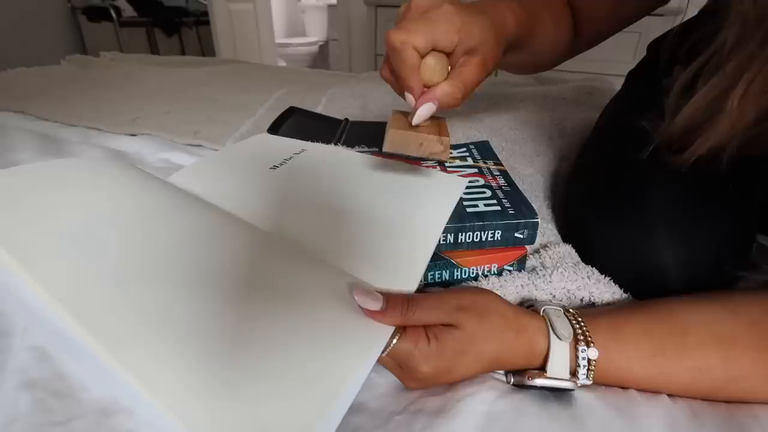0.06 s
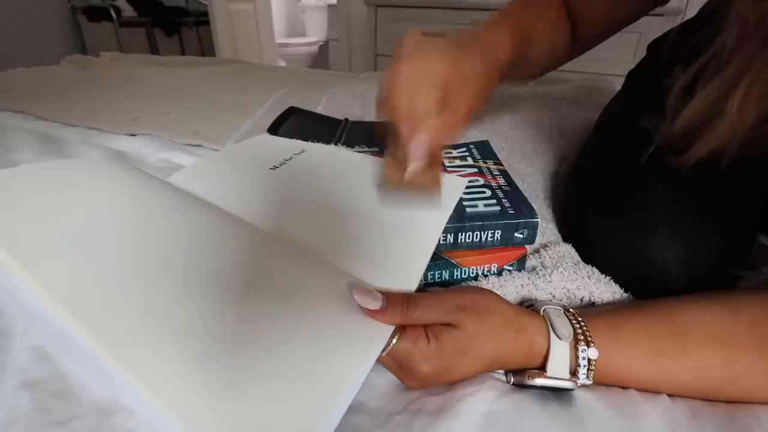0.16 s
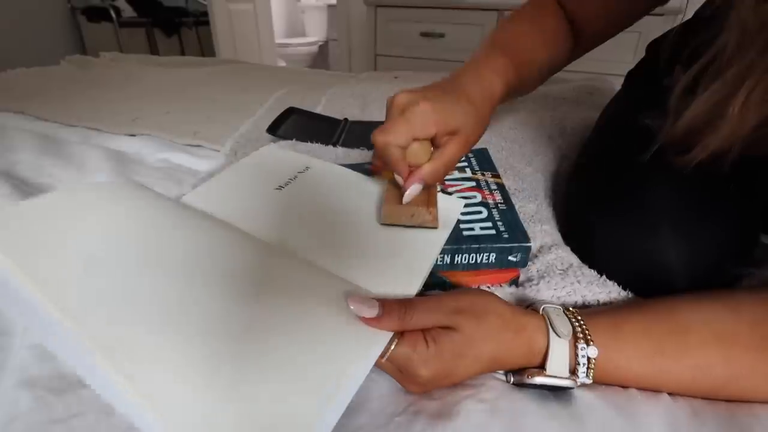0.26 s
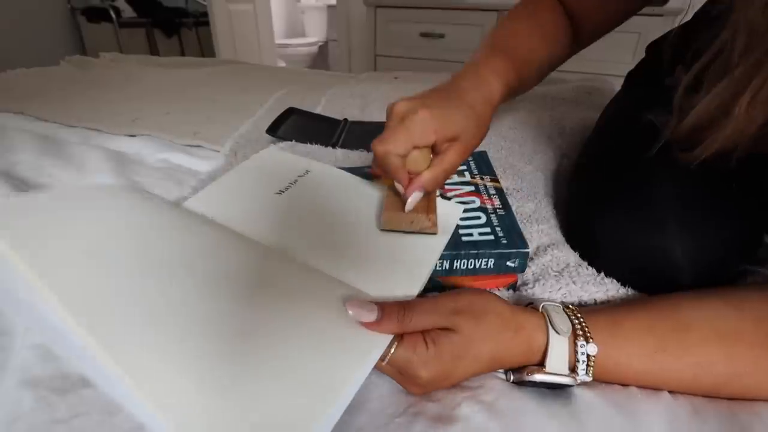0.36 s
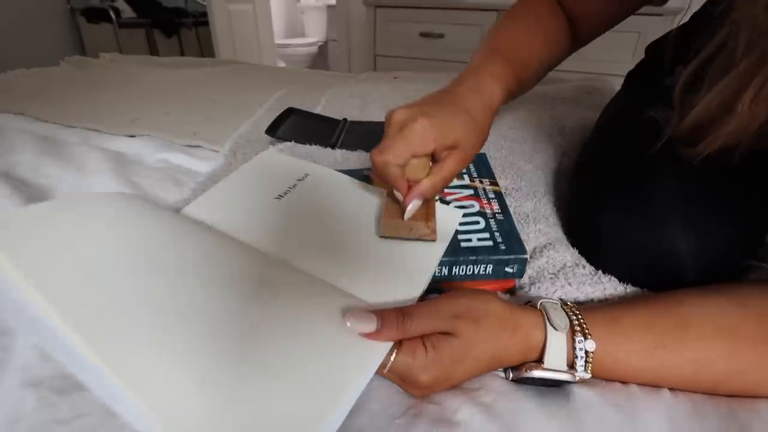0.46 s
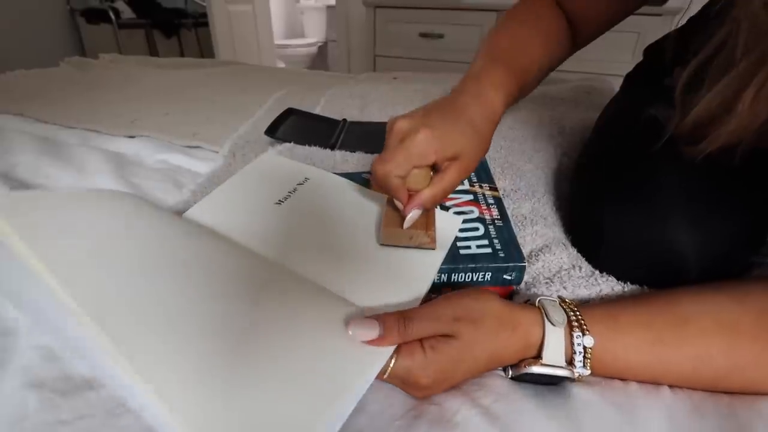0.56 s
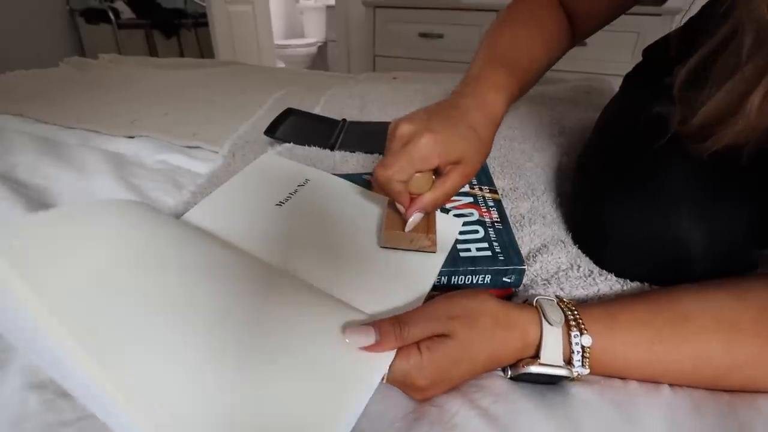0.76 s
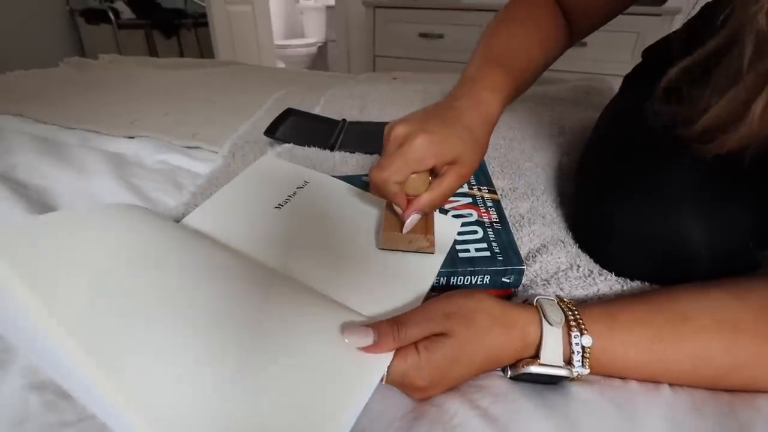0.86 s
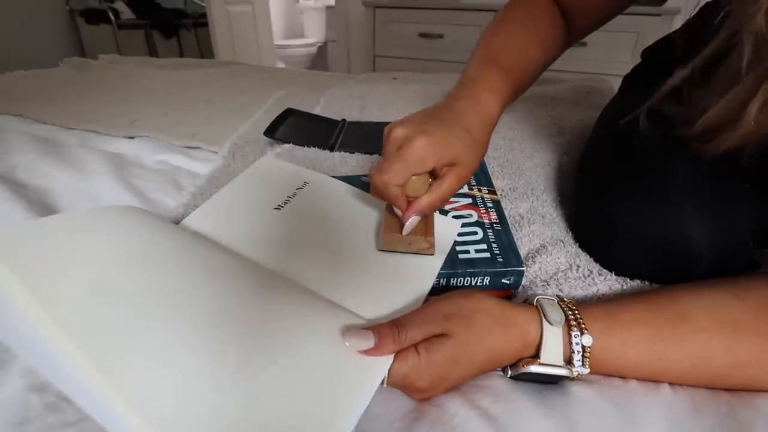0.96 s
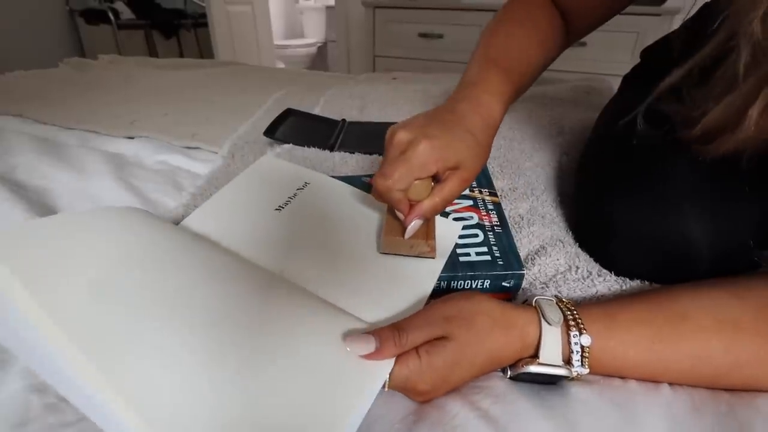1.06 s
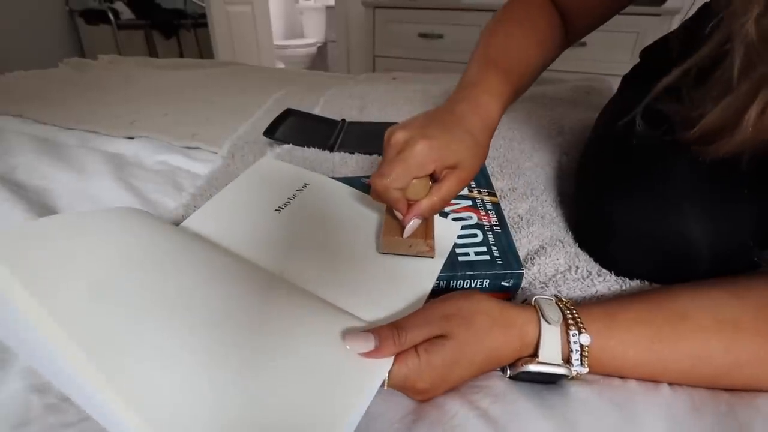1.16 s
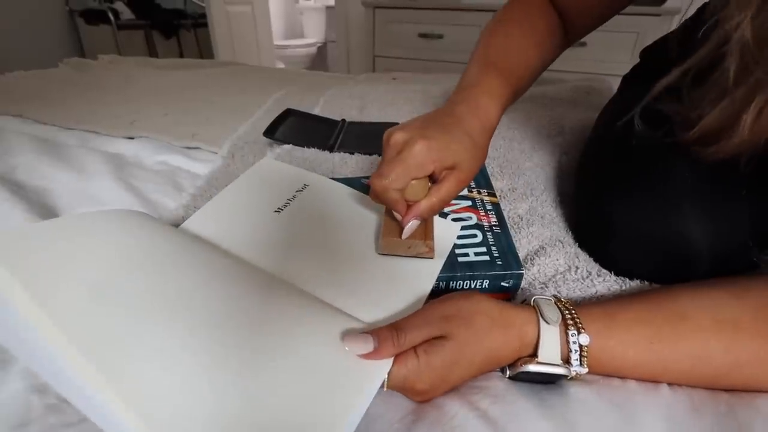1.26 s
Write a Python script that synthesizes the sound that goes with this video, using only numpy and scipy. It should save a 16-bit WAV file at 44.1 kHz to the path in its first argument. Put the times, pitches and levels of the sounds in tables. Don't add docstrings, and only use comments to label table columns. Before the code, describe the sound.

A wooden hand stamp smacks onto a thick book's page, then faint paper ticks and rustle follow

```python
import sys
import numpy as np
from scipy import signal
from scipy.fft import rfft, irfft
from scipy.io import wavfile
from scipy.ndimage import uniform_filter1d, map_coordinates

SR = 44100
rng = np.random.default_rng(int(sys.argv[2]) if len(sys.argv) > 2 else 0)


def persist_wave(psi):
    counts = np.round(np.clip(psi, -1, 1) * 32767).astype(np.int16)
    wavfile.write(sys.argv[1], SR, np.atleast_2d(counts).T)


def nominal_scale(level):
    x = np.asarray(level, float) / 20
    return 10 ** x


N = 57330

# multiple of the mains pitch, rms level in dB.
HUM_MULTIPLES = [(1, -49), (2, -52.5), (3, -54.5), (4, -61), (5, -65.5), (6, -78)]
MAINS_HZ, HUM_FLICKER_DB = 59.82, 1.5
ROTOR_SLIP_HZ, ROTOR_DB, BEAT_PEAK_S = 1.98, -50, 0.7

# frequency in Hz, level in dB per Hz.
AIR_COLOUR = [(30, -6), (55, -0.5), (150, -6.5), (450, -13.5), (1100, -21), (3400, -26.5), (5500, -35),
              (14000, -51)]
AIR_DB, AIR_FLICKER_DB = -51, 0.3
AIR_WIDE_HZ, AIR_TOP_HZ = 700, 12700

# time in seconds, rustle level in dB.
HAND_PRESSURE = [
    (.3, -74.5),
    (.42, -59.5),
    (.5, -60.5),
    (.58, -54),
    (.66, -55.5),
    (.7, -62.5),
    (.97, -61.5),
    (1.08, -72),
    (1.3, -85.5),
]
GRAINS_PER_S, GRAIN_SPREAD_DB = 2500, 1.7
PAPER_LOW_HZ, PAPER_WIDTH_HZ = 500, 2710

# start in seconds, level in dB, pitch in Hz.
PAPER_TICKS = [(.52, -42, 1294), (.538, -62, 1300), (.579, -38.5, 765), (.581, -43, 1830),
               (.606, -47, 1880), (0.633, -45, 1520), (.652, -41, 700), (.653, -42.5, 1850),
               (.666, -54, 1900), (.683, -44.5, 500), (.87, -51, 600), (1.122, -50, 2660),
               (1.231, -47, 600)]
TICK_T60_S, TICK_CLICK_DB = 0.02, -16

# start in seconds, level in dB, contact time in milliseconds.
BLOWS = [
    (0.2242, 0, 0.32),
    (0.2259, -8.5, 0.4),
    (0.2471, -11, 0.53),
]
FIRST_BLOW_S = BLOWS[0][0]

# pitch in Hz, level in dB, time to fade by 60 dB in seconds.
WOOD_MODES = [(367, -9, .025), (464, -1.5, 0.025), (510.4, -18, 0.086), (600, -13.5, 0.066),
              (683, -6, 0.049), (819, -13, 0.058), (922, -14, 0.066), (1050, -31.5, 0.053),
              (1443, -17, .06), (1597, -5.5, .016), (2058, -15, .015), (2360, -13, 0.021),
              (2830, -17, .015), (3400, -48, .01)]

# pitch in Hz, level in dB, time to fade by 60 dB in seconds.
BOOK_MODES = [(108.4, -25, 0.33), (154, -6.5, 0.18), (194.7, -7, 0.16), (274, -12.5, 0.033)]
BOOK_LATE_S, BOOK_PUSH_MS = 0.0065, 4.3

# centre in Hz, width in Hz, level in dB, time to fade by 60 dB in seconds.
PAGE_SLAP = [(689, 93, -20, 0.22), (413, 660, -22, 0.23), (940, 990, -21, 0.24), (2550, 3700, -26.5, 0.26),
             (4900, 510, -41.5, 0.67)]
PAGE_DIP_MS, PAGE_DIP_DB = 0.26, -14
CRACK_DB, CRACK_HZ, CRACK_WIDTH_HZ, CRACK_T60_S = -14, 7740, 3200, 0.0055

ROOM_DB, ROOM_GAP_S = -22.5, 0.006
ROOM_T60_LOW_S, ROOM_T60_HIGH_S = 0.3, 0.26
ROOM_TOP_HZ, ROOM_SHARED_HZ = 3540, 2500

PORT_LAG_MS, KNOCK_PAN_DB = 0.062, 2.8
MIC_LOW_HZ, MIC_TOP_HZ = 95, 9900
DUCK_DB, DUCK_ATTACK_S, DUCK_RELEASE_S, CEILING = -5.5, 0.016, 0.14, 1.03


def band(x, hz, width_hz):
    centre = min(hz, 0.45 * SR)
    sharpness = max(hz / width_hz, 0.3)
    return signal.lfilter(*signal.iirpeak(centre, sharpness, fs=SR), x)


def decay(t60, seconds=0.5):
    t = np.arange(int(seconds * SR)) / SR
    return np.exp(-np.log(1000) * t / t60)


def ring(modes):
    t = np.arange(SR // 2) / SR
    return sum(nominal_scale(db) * np.sin(2 * np.pi * hz * t) * decay(t60) for hz, db, t60 in modes)


def push(at_s, ms):
    progress = (np.arange(N) / SR - at_s) / (ms / 1000)
    touching = (progress > 0) & (progress < 1)
    force = np.where(touching, np.sin(np.pi * progress) ** 2, 0)
    return force / max(force.sum(), 1e-9)


def conv(a, b):
    return signal.fftconvolve(a, b)[:N]


def unit(x):
    return x / np.sqrt(np.mean(x ** 2))


def walk(rate):
    hold = int(SR / rate)
    steps = np.repeat(rng.standard_normal(N // hold + 1), hold)
    smooth = uniform_filter1d(uniform_filter1d(steps, hold), hold)
    return 2.0 * smooth[:N]


def noise_band(hz, width_hz):
    noise = rng.standard_normal(SR // 2)
    return unit(band(band(noise, hz, width_hz), hz, width_hz))


def hum():
    t = np.arange(N) / SR - BEAT_PEAK_S
    out = nominal_scale(ROTOR_DB) * np.cos(2 * np.pi * (MAINS_HZ - ROTOR_SLIP_HZ) * t)
    for multiple, db in HUM_MULTIPLES:
        upper = multiple > 1
        waver_db = upper * HUM_FLICKER_DB * walk(16)
        cycles = multiple * MAINS_HZ * t + upper * rng.random()
        out = out + nominal_scale(db + waver_db) * np.cos(2 * np.pi * cycles)
    return np.sqrt(2) * out


def air():
    hz = np.maximum(np.arange(N // 2 + 1) * SR / N, 1)
    table = np.array(AIR_COLOUR)
    colour_db = np.interp(np.log(hz), np.log(table[:, 0]), table[:, 1])
    gain = nominal_scale(colour_db + np.where(hz > AIR_TOP_HZ, -25.0, 0))
    wide = hz / np.hypot(hz, AIR_WIDE_HZ) * nominal_scale(3.0)
    mid = irfft(rfft(rng.standard_normal(N)) * gain, N)
    side = irfft(rfft(rng.standard_normal(N)) * gain * wide, N)
    level = nominal_scale(AIR_DB + AIR_FLICKER_DB * walk(9)) / np.sqrt(np.mean(mid ** 2))
    return np.array([mid + side, mid - side]) * level


def room(x):
    tails = []
    for _ in range(2):
        noise = rng.standard_normal((2, SR // 2))
        low = signal.lfilter(*signal.butter(1, 900, fs=SR), noise[0]) * decay(ROOM_T60_LOW_S)
        high = band(noise[1], ROOM_TOP_HZ / 2, ROOM_TOP_HZ) * decay(ROOM_T60_HIGH_S) * nominal_scale(3)
        tail = np.concatenate([np.zeros(int(ROOM_GAP_S * SR)), low + high])
        tails.append(conv(x, tail / np.sqrt(np.sum(tail ** 2))))
    left, right = tails
    low_shared = signal.lfilter(*signal.butter(1, ROOM_SHARED_HZ, fs=SR), left - right)
    return nominal_scale(ROOM_DB) * np.array([left, right + low_shared])


def rustle():
    slips = rng.random(N) < GRAINS_PER_S / SR
    grains = slips * rng.standard_normal(N) * nominal_scale(GRAIN_SPREAD_DB * rng.exponential(size=N))
    power = np.abs(conv(grains ** 2, decay(0.015)))
    smear = rng.standard_normal(N) * np.sqrt(power)
    edges_hz = [PAPER_LOW_HZ, PAPER_LOW_HZ + PAPER_WIDTH_HZ]
    edges = signal.butter(2, edges_hz, "band", fs=SR, output="sos")
    fibres = unit(signal.sosfilt(np.vstack([edges, edges]), smear))
    hand = np.array(HAND_PRESSURE)
    return fibres * nominal_scale(np.interp(np.arange(N) / SR, hand[:, 0], hand[:, 1]))


def paper_ticks():
    out = np.zeros(N)
    for start_s, db, hz in PAPER_TICKS:
        click = rng.standard_normal(SR // 2) * decay(0.012) * nominal_scale(TICK_CLICK_DB)
        tick = ring([(hz, 0, TICK_T60_S)]) + click
        out = out + nominal_scale(db) * conv(push(start_s, 0.091), tick)
    return out


def book_thud():
    pushes = sum(nominal_scale(db) * push(s + BOOK_LATE_S, BOOK_PUSH_MS) for s, db, ms in BLOWS)
    return conv(pushes, ring(BOOK_MODES))


def air_crack():
    snap = noise_band(CRACK_HZ, CRACK_WIDTH_HZ) * decay(CRACK_T60_S)
    return nominal_scale(CRACK_DB) * conv(push(FIRST_BLOW_S - PAGE_DIP_MS / 1000, 0.039), snap)


def stamp():
    blows = sum(nominal_scale(db) * push(s, ms) for s, db, ms in BLOWS)
    blows = blows - nominal_scale(PAGE_DIP_DB) * push(FIRST_BLOW_S - PAGE_DIP_MS / 1000, 0.32)
    pages = sum(nominal_scale(db) * noise_band(hz, width) * decay(t60) for hz, width, db, t60 in PAGE_SLAP)
    sound = conv(blows, ring(WOOD_MODES) + pages) + book_thud() + air_crack()
    return signal.lfilter(*signal.butter(2, MIC_LOW_HZ, "high", fs=SR), sound)


def scene():
    near = stamp() + rustle() + paper_ticks()
    late = map_coordinates(near, [np.arange(N) - PORT_LAG_MS * SR / 1000], mode="nearest")
    treble = late - signal.lfilter(*signal.butter(1, 300, fs=SR), late)
    left = late + (nominal_scale(KNOCK_PAN_DB) - 1) * treble
    return np.array([left, near]) + room(near) + hum() + air()


def band_limit(x):
    return signal.sosfilt(signal.butter(12, 15600, fs=SR, output="sos"), x)


def record(dry):
    since = np.arange(N) / SR - FIRST_BLOW_S
    onset = np.clip(since / DUCK_ATTACK_S, 0, 1)
    recovery = np.exp(-np.maximum(since, 0) / DUCK_RELEASE_S)
    x = dry * nominal_scale(DUCK_DB * onset * recovery) / CEILING
    flattened = CEILING * x / (1 + np.abs(x) ** 8) ** (1 / 8)
    mix = signal.lfilter(*signal.butter(1, MIC_TOP_HZ, fs=SR), flattened)
    return band_limit(mix)


dry = scene()
out = record(dry)
persist_wave(out)
```